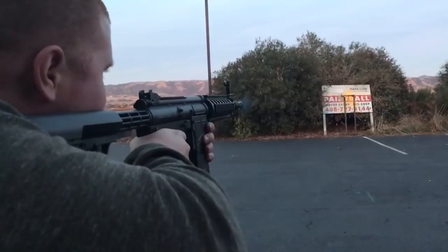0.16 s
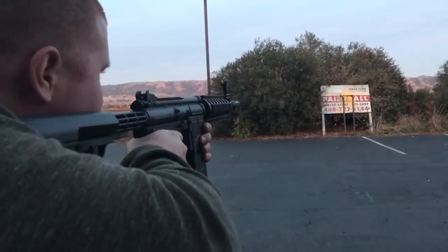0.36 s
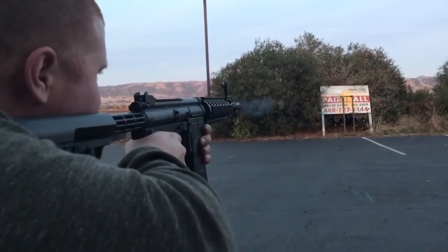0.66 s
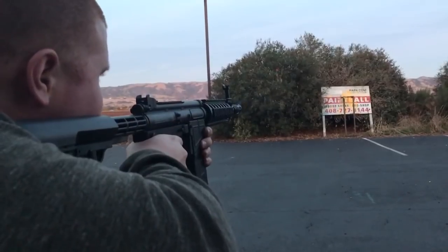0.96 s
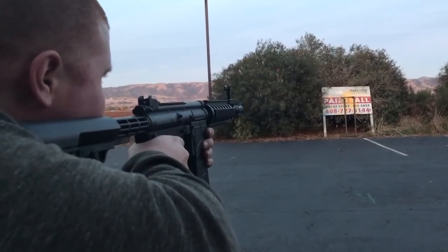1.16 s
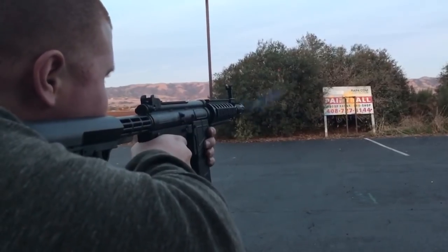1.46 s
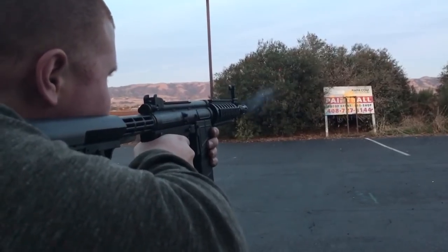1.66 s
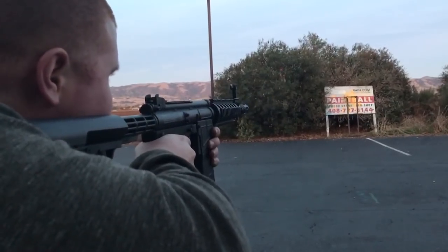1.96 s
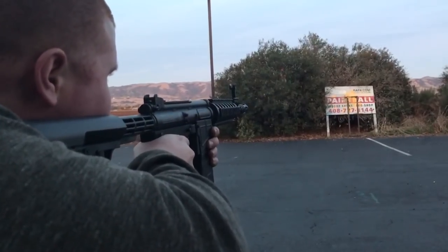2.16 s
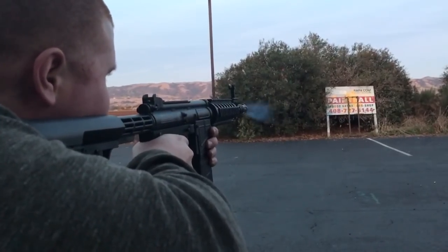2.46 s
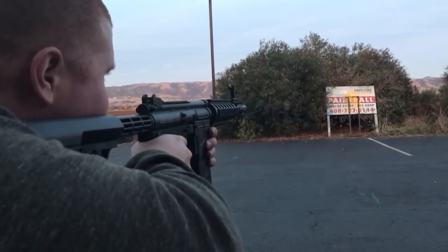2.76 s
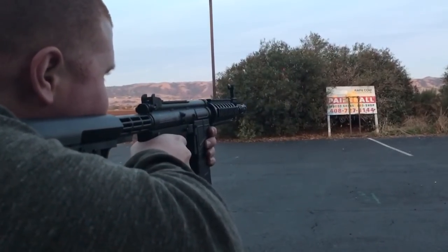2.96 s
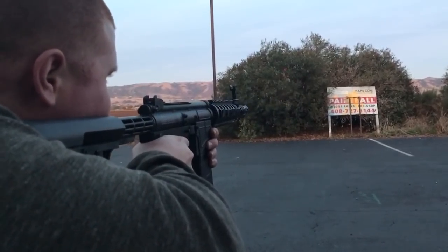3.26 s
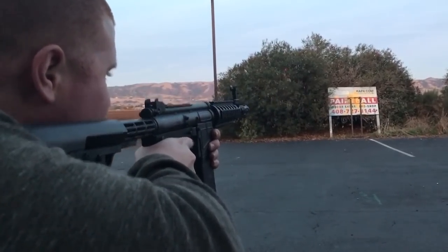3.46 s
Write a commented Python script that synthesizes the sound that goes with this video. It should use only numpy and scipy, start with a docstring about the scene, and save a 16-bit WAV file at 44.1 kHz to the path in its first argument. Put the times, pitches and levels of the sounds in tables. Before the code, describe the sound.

Quick, even paintball shots pop close by, with fainter slaps and metallic pings from distant hits.

```python
"""An open parking area, where a paintball marker fires sixteen quick shots close by.
Each shot is a clatter of trigger and hammer, a blast of gas down the barrel, a pop at the muzzle and
the bolt clacking back; the last two shots have no ball. The asphalt and a row of trees echo the shots.
Far off, the balls slap a sign board or ring a steel pole. A light wind rumbles underneath."""
import sys
import numpy as np
from scipy import signal
from scipy.fft import rfft, irfft, next_fast_len
from scipy.io import wavfile
from scipy.ndimage import map_coordinates

SR = 44100
rng = np.random.default_rng(int(sys.argv[2]) if len(sys.argv) > 2 else 0)


def waveform_to_disk(signal):
    """Save audio, clipped to [-1, 1], as 16-bit WAV at the path in sys.argv[1]."""
    frames = np.transpose(np.atleast_2d(signal))
    scaled = np.clip(frames, -1, 1) * 32767
    samples = np.round(scaled).astype(np.int16)
    wavfile.write(sys.argv[1], SR, samples)


N = 158760
T = np.arange(SR) / SR  # one second of sample times

# the shots (time [s], clatter level [dB], wait until the trigger clicks back [s])
SHOTS = [(0.2521, 1, 0.12), (0.4843, 0, 0.096), (0.6981, -1.5, 0.1), (0.8917, -4.5, 0.1), (1.0869, -3, 0.1),
         (1.2957, -3.5, 0.097), (1.4883, -5.5, 0.11), (1.698, -3, 0.1), (1.8961, -4, 0.11),
         (2.0958, -4.5, .107), (2.3074, -3.5, .111), (2.5207, -6, .1005), (2.715, -4, 0.11),
         (2.919, -4.5, 0.1), (3.1186, -5, .1), (3.3105, -10, 0.11)]
def marker(shots_with_ball=14):
    """Each pull of the trigger lets out a burst of gas and works the bolt."""
    out = np.zeros(N)
    click_colour = [(2000, -1.5), (6000, 0), (11000, -6.5), (14500, 0.5)]
    for i, (s, clatter_db, reset_s) in enumerate(SHOTS):
        loaded = i < shots_with_ball
        # with no ball in the way, less pressure builds up
        blast_db, barrel_db, bolt_db = (0, 0, 0) if loaded else (-1.5, -9, -9.5)
        trigger_clatter(out, s, clatter_db)
        add(out, s - 0.0005, amp(blast_db) * gas_blast())
        add(out, s, amp(barrel_db + 5) * barrel_ring())
        add(out, s + 0.007395, muzzle_pop(loaded))
        bolt_return(out, s + 0.0293, bolt_db)
        # the trigger clicks back
        add(out, s + reset_s, amp(-29) * noise(click_colour) * envelope(0.0015, 0.0021, 0.019))
    return out


# tone of the pop with a ball, then without (frequency [Hz], level [dB])
LOADED_POP = [(25, -23), (60, 3.5), (140, 5.5), (220, 1.5), (300, 2), (450, -5.5), (600, -2.5),
              (760, -19.5), (1200, -9.5), (4000, -54)]
EMPTY_POP = [(30, -19), (90, 1), (150, 5), (260, -10), (440, 0), (560, -6), (720, -18), (4000, -31)]
def muzzle_pop(loaded):
    """Gas leaves the muzzle as one low thump of pressure."""
    db, colour = (13.5, LOADED_POP) if loaded else (14, EMPTY_POP)
    return -amp(db) * pulse(colour)


# tone of the rushing gas (frequency [Hz], level [dB])
GAS_COLOUR = [(300, -15), (700, -11.5), (1000, 0), (1700, -4), (2100, -3.5), (2700, 2), (3500, 1),
              (4800, -8), (5400, -2.5), (7200, -10.5), (10500, -15.5), (15000, -14.5)]
# notes of the marker's metal body (pitch [Hz], level [dB], fade time [s])
BODY_NOTES = [(1617, -15, 0.029), (2530, -13, 0.038), (3447, -20.5, 0.055), (4605, -21.5, 0.07),
              (5220, -24.5, 0.079)]
def gas_blast():
    """Gas rushes out with a sharp hiss and sets the metal body ringing."""
    rush = amp(-9.5) * noise(GAS_COLOUR) * envelope(0.0012, 0.0056, 0.053)
    hiss = amp(-10) * noise([(3000, -23.5), (7000, -9), (15000, -7.5)])
    hiss *= envelope(0.00053, 0.0018, 0.0087)
    return rush + hiss + ring(BODY_NOTES, 0.00098, 2.8, size=SR // 8)


# notes of the air in the barrel (pitch [Hz], level [dB], fade time [s])
BARREL_NOTES = [(316.4, -33, 0.1), (439, -9.5, 0.022), (579, -10.5, 0.026), (849, -14, 0.031),
                (993, -29, 0.041), (1215, -22, 0.017), (1707, -14.5, 0.037)]
def barrel_ring():
    """The air in the barrel rings briefly, as in a pipe."""
    return sum(amp(db) * envelope(0.0029, 0, fade_s) * np.sin(2 * np.pi * hz * T)
               for hz, db, fade_s in BARREL_NOTES)


# tone of the bolt (frequency [Hz], level [dB])
CLACK_COLOUR = [(200, -7), (800, -15), (1600, -1), (2000, -4.5), (2500, 3), (3400, -4), (4800, -5.5),
                (5400, -1.5), (7000, -12.5), (15000, -18)]
def bolt_return(out, s, db):
    """The bolt slides back and hits its stop at time s, ringing the body."""
    slide = amp(-17) * noise(CLACK_COLOUR) * envelope(0.0058, 0.0058, 0.041)
    clack = amp(-5) * noise(CLACK_COLOUR) * envelope(0.00062, 0.00096, 0.011)
    body = amp(-8) * ring(BODY_NOTES, 0.00071, 0.5, size=SR // 8)
    add(out, s - 0.0045, amp(db) * slide)
    add(out, s, amp(db) * (clack + body))


# taps of trigger and hammer (time before the shot [s], level [dB])
TAPS = [(.0178, -18), (0.013, -20), (0.0099, -25.5)]
# their tone (frequency [Hz], level [dB])
TAP_COLOUR = [(200, -20.5), (900, -11.5), (1600, -6.5), (2600, -4), (3700, -3), (6000, -10.5),
              (10000, -17.5), (15000, -22.5)]
def trigger_clatter(out, s, db):
    """A faint hiss swells just before the shot, and trigger and hammer make three taps."""
    add(out, s - 0.023, amp(db - 35) * noise(TAP_COLOUR) * envelope(0.004, 0.0051, 0.02))
    for early_s, tap_db in TAPS:
        start = s - early_s + rng.normal(0, 0.0004)
        add(out, start, amp(db + tap_db) * noise(TAP_COLOUR) * envelope(0.001, 0.002, 0.037))


# balls hitting the sign (time [s], slap level [dB], boom level [dB])
SIGN_HITS = [(.533, -19, -32), (0.7704, -17.5, -31.5), (1.174, -27, -36.5), (1.362, -20, -28),
             (1.574, -19, -32.5), (1.977, -18.5, -39), (2.587, -18, -24.5), (2.797, -18, -38),
             (3.002, -20, -31.5)]
# tone of the slap (frequency [Hz], level [dB])
SPLAT_COLOUR = [(150, 5.5), (400, 4.5), (700, -10.5), (1200, 3), (2000, -3.5), (4000, -9.5), (8000, -15),
                (15000, -26.5)]
# notes of the panel (pitch [Hz], level [dB], fade time [s])
SIGN_NOTES = [(130, -2.5, 0.34), (155.3, -1.5, 0.49), (178.8, 0.5, 0.24), (206.5, -0.5, 0.24),
              (295, -10, 0.2)]
def sign_board():
    """A ball bursts on the sign with a wet slap, and the panel booms."""
    out = np.zeros(N)
    for s, slap_db, boom_db in SIGN_HITS:
        slap = amp(slap_db) * noise(SPLAT_COLOUR) * envelope(0.00027, 0.001, 0.066)
        boom = amp(boom_db) * ring(SIGN_NOTES, 0.0024, 3.2)
        add(out, s, slap + boom)
    return out


# balls hitting the pole
# (time [s], ring level [dB], favoured pitch [Hz], clang level [dB], crack level [dB])
STEEL_HITS = [(-.04, -31, 1320, -22.5, -23), (0.964, -34.5, 2600, -25, -13.5),
              (1.7536, -44, 5330, -25.5, -16.5), (2.164, -37, 1670, -27.5, -17),
              (2.356, -39.5, 2720, -26.5, -17), (3.172, -35.5, 1560, -28, -26)]
# main notes of the pole (pitch [Hz], level [dB], fade time [s])
POLE_NOTES = [(1276, -11.5, 0.86), (1404, -2, 0.42), (1610, -7.5, 1.43), (1642, -2, 0.71), (1730, -2, 0.64),
              (5700, -6, 0.29), (9300, -5, .18), (2135, -1.5, 0.66), (2514, 0.5, 0.27), (2745, -12.5, 0.45),
              (3200, -3, 0.37), (3935, -2, 0.31), (4180, -6, 0.35), (5100, -4, 0.33)]
def steel_pole(boost_db=11.5, width_octaves=0.22):
    """A ball bursts on the pole: a crack, a clang and a long ring."""
    out = np.zeros(N)
    hz, db, fade_s = np.transpose(POLE_NOTES)
    for s, ring_db, favoured_hz, clang_db, crack_db in STEEL_HITS:
        # the spot that is hit brings out the notes near one pitch
        nearness = np.exp(-(np.log2(hz / favoured_hz) / width_octaves) ** 2)
        notes = zip(hz, db + boost_db * nearness, fade_s)
        crack = amp(crack_db) * noise([(1000, 2), (4000, 5), (15000, 0)])
        crack *= envelope(0.0001, 0.00062, 0.015)
        clang = amp(clang_db) * pole_clang()
        add(out, s, crack + clang + amp(ring_db) * ring(notes, 0.00086, 0.73))
    return out


# tone of the pole's wall (frequency [Hz], level [dB])
WALL_COLOUR = [(1100, -9), (1650, -2), (2000, -9), (2600, 0), (3400, -7), (4150, -2), (4750, -10),
               (5400, 0), (7400, -11), (9100, -3), (10100, -18)]
def pole_clang(count=56):
    """A hit wakes many weak, unevenly spaced notes in the pole's wall."""
    spread = (np.arange(count) + rng.uniform(0, 1, count)) / count
    hz = 1100 + 9000 * spread ** 1.4
    db = np.interp(hz, *np.transpose(WALL_COLOUR))
    db -= 10 * np.log10(np.sum(amp(db) ** 2) / 2)  # scale the total power to 1
    fade_s = 0.33 * (1730 / hz) ** 0.44  # high notes die sooner
    return ring(zip(hz, db, fade_s), 0.00027, 3.35, size=SR // 2)


# tone of the echo from the trees (frequency [Hz], level [dB])
TREE_COLOUR = [(100, 6), (1300, -0.5), (3000, -3.5), (15000, -8)]
def outdoors(x):
    """The sound bounces off the asphalt, off things nearby and, softly, off the trees."""
    out, echo = x.copy(), np.zeros(SR)
    dull_bounce = signal.lfilter(*signal.butter(1, 1390, fs=SR), x)
    add(out, 0.0068, amp(-13.5) * dull_bounce)
    nearby = noise([(100, 3.5), (600, -4.5), (2000, -8.5), (6000, -2), (15000, -5)])
    nearby *= envelope(0.0046, 0.011, 0.36)
    trees = noise(TREE_COLOUR) * envelope(0.013, 0.042, 0.203)
    add(echo, 0.008, amp(-22) * nearby / np.linalg.norm(nearby))
    add(echo, 0.07, amp(-36) * trees / np.linalg.norm(trees))
    return out + signal.fftconvolve(x, echo)[:N]


# tone of the wind (frequency [Hz], level [dB])
WIND_COLOUR = [(20, -31), (55, 4), (150, -1.5), (300, -13), (600, -17), (1500, -18.5), (4000, -29.5),
               (15000, -43.5)]
# its slow rise and fall (time [s], level [dB])
WIND_LEVELS = [(0, -35), (.6, -40.5), (1.2, -38), (2.2, -39.5), (3.2, -42.5), (3.6, -43.5)]
def wind(gust_db=1.8, changes_per_s=14):
    """Moving air makes a low, slightly uneven rumble."""
    steps = rng.standard_normal(int(N * changes_per_s / SR) + 4)
    gusts = map_coordinates(steps, [np.arange(N) * changes_per_s / SR])  # glide between the steps
    db = np.interp(np.arange(N) / SR, *np.transpose(WIND_LEVELS))
    return noise(WIND_COLOUR, size=N) * amp(db + gust_db * gusts)


def amp(db):
    """Turn decibels into a multiplier."""
    return 10 ** (np.asarray(db) / 20)


def gains(colour, size):
    """Turn a colour, a list of (frequency [Hz], level [dB]), into a gain for each frequency."""
    hz, db = np.transpose(colour)
    return amp(np.interp(np.log(np.fft.rfftfreq(size, 1 / SR) + 1), np.log(hz), db))


def noise(colour, size=SR):
    """Noise with the given tone and an average power of 1."""
    x = irfft(rfft(rng.standard_normal(size)) * gains(colour, size), size)
    return x / np.sqrt(np.mean(x ** 2) + 1e-20)


def pulse(colour):
    """One push of air with the given tone and an energy of 1."""
    cepstrum = irfft(np.log(gains(colour, SR)), SR)
    # folding the second half onto the first packs the energy at the start
    cepstrum[1:SR // 2] *= 2
    cepstrum[SR // 2 + 1:] = 0
    push = irfft(np.exp(rfft(cepstrum)), SR)
    return push / np.linalg.norm(push)


def envelope(rise_s, hold_s, fade_s):
    """Rise, hold, then fade; a fade time is how long a 60 dB drop takes."""
    return (1 - np.exp(-T / rise_s)) * 1000 ** (-np.maximum(T - hold_s, 0) / fade_s)


def ring(notes, rise_s, scatter_db, size=SR):
    """Fading notes of a struck object, each a little louder or softer at every hit."""
    t, out = T[:size], np.zeros(size)
    for hz, db, fade_s in notes:
        level = amp(db + scatter_db * rng.normal()) * 1000 ** (-t / fade_s)
        out += level * np.sin(2 * np.pi * hz * t + rng.uniform(0, 2 * np.pi))
    return np.pad(out * (1 - np.exp(-t / rise_s)), (0, SR - size))


def add(track, s, x):
    """Mix x into the track at time s."""
    k = round(s * SR)
    x = x[max(-k, 0):max(len(track) - k, 0)]
    track[max(k, 0):][:len(x)] += x


def scene():
    """Mix the shots, the hits and the wind into one channel."""
    return (outdoors(marker()) + sign_board() + steel_pole() + wind())[None]


def record(dry):
    """The recorder rounds off loud peaks and cuts the highest treble."""
    ceiling, top_hz = 1.05, 16000
    rounded = dry / (1 + np.abs(dry / ceiling) ** 4) ** (1 / 4)
    size = next_fast_len(N + SR // 2)
    hz = np.fft.rfftfreq(size, 1 / SR)
    return irfft(rfft(rounded, size) / np.sqrt(1 + (hz / top_hz) ** 160), size)[:, :N]


dry = scene()
out = record(dry)
waveform_to_disk(out)
```